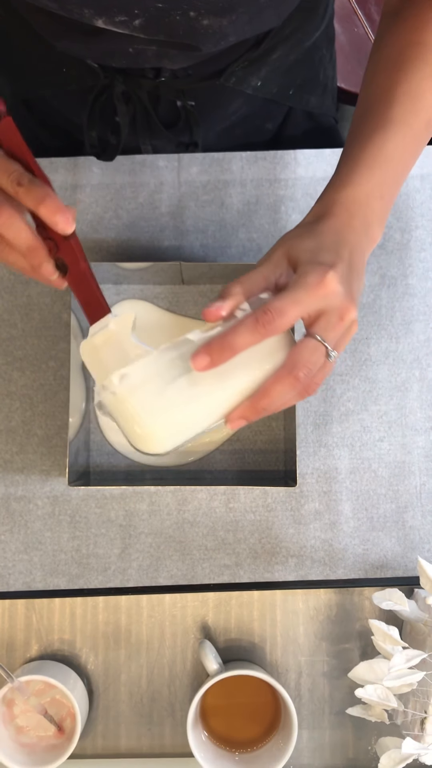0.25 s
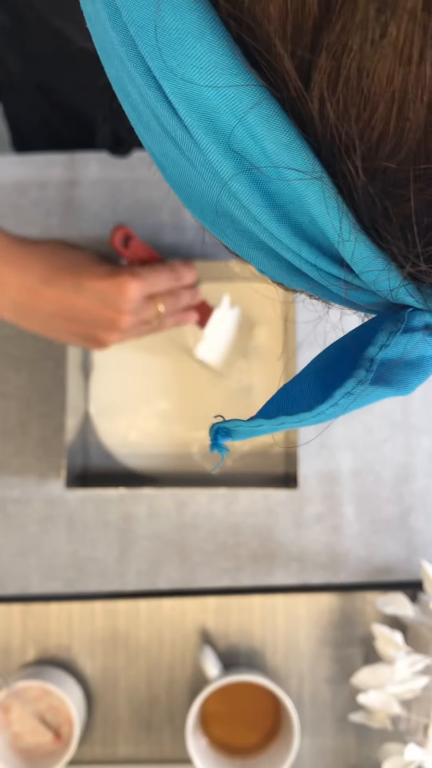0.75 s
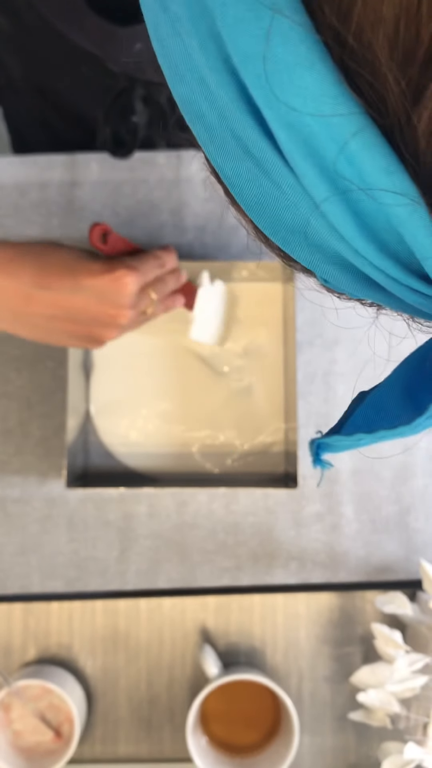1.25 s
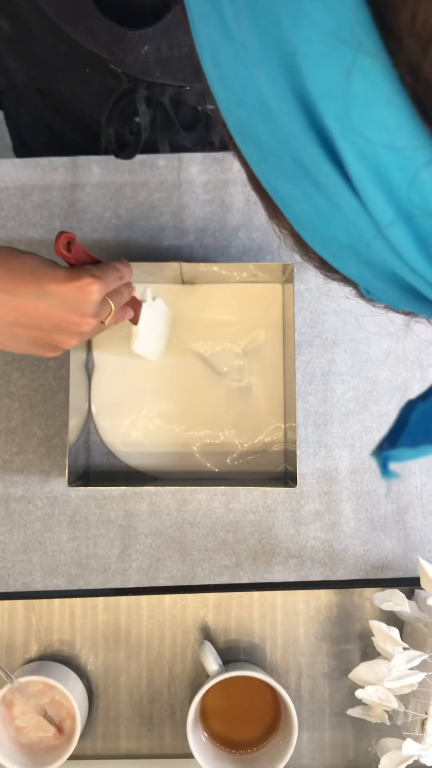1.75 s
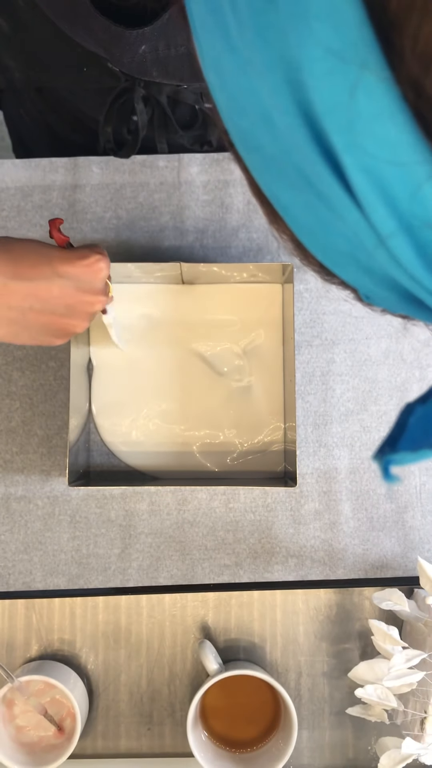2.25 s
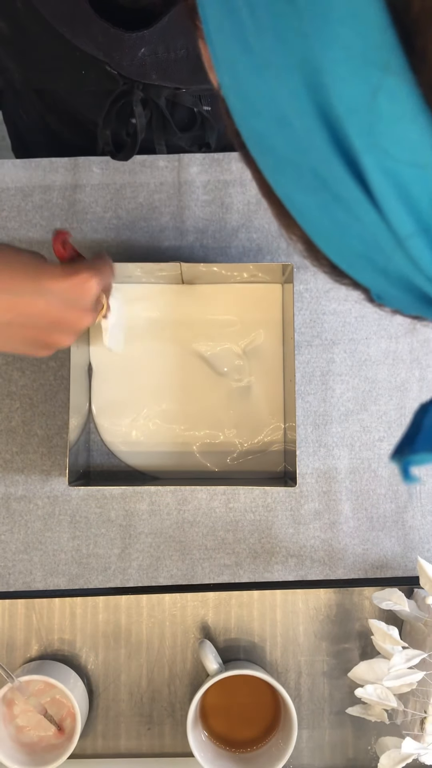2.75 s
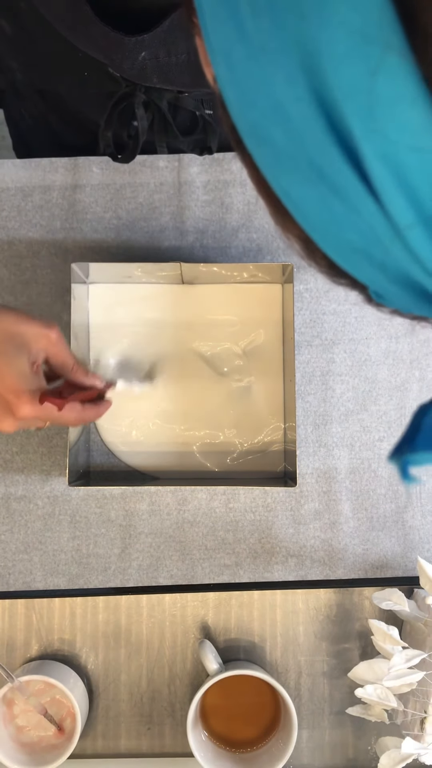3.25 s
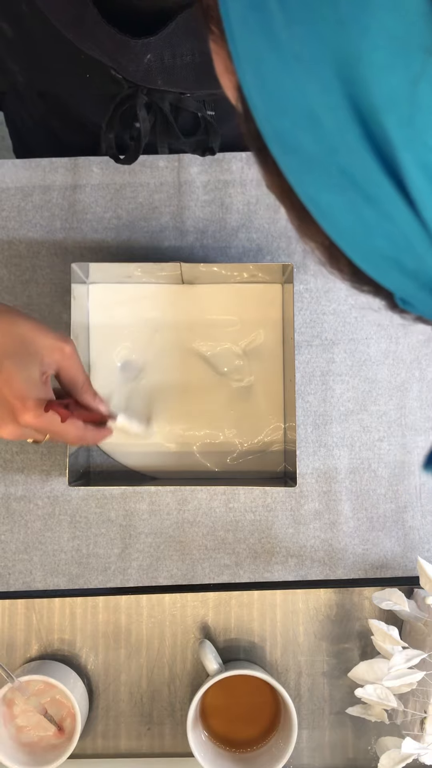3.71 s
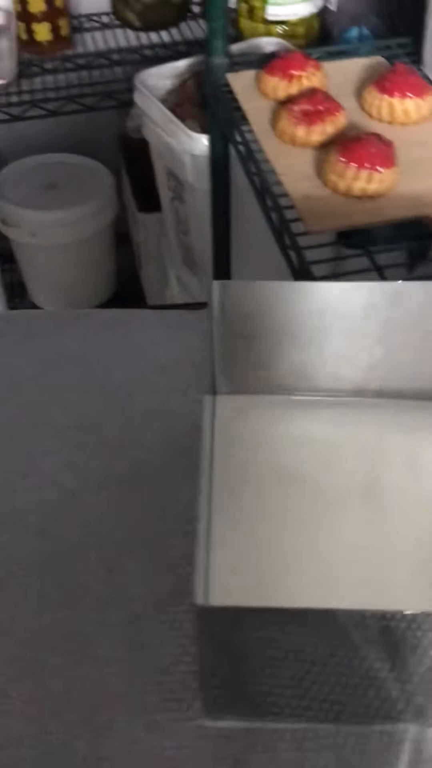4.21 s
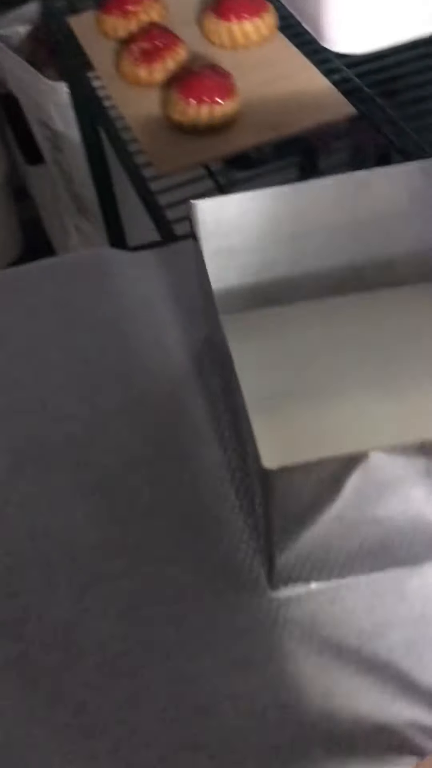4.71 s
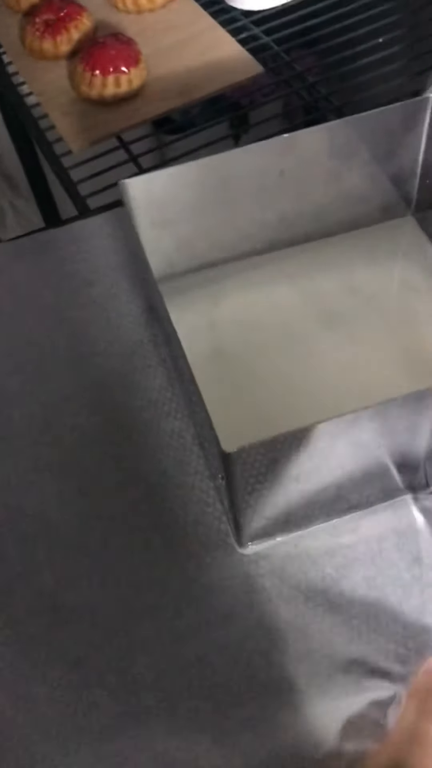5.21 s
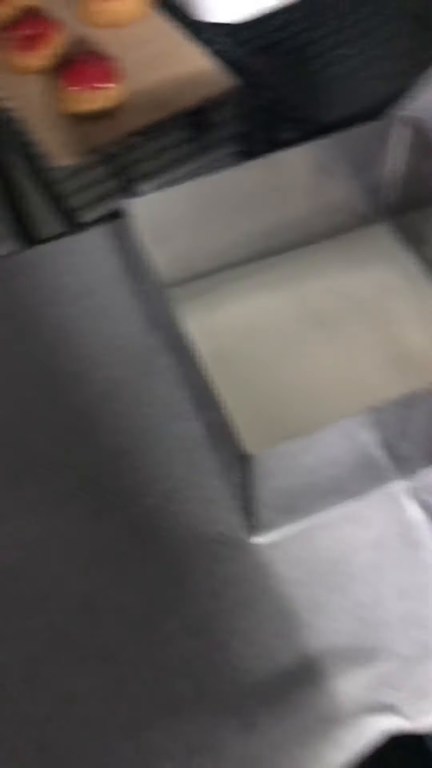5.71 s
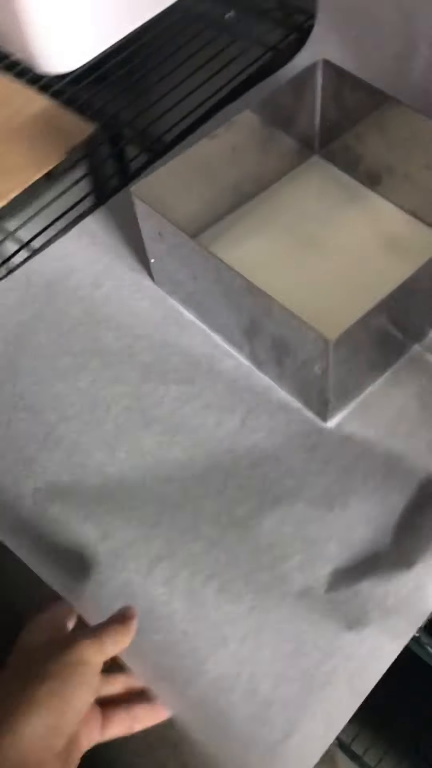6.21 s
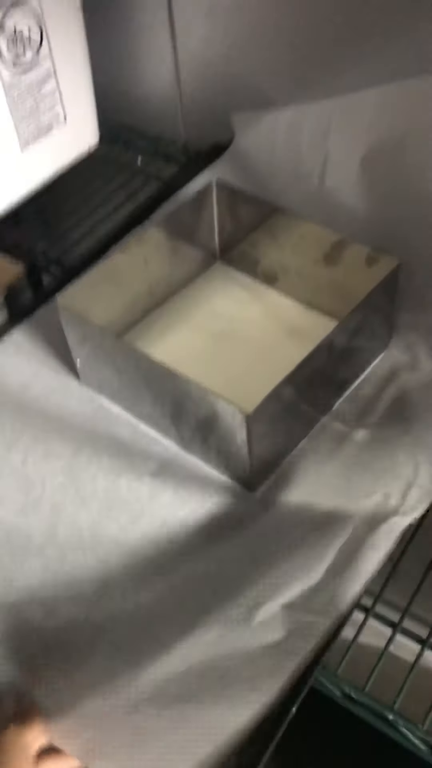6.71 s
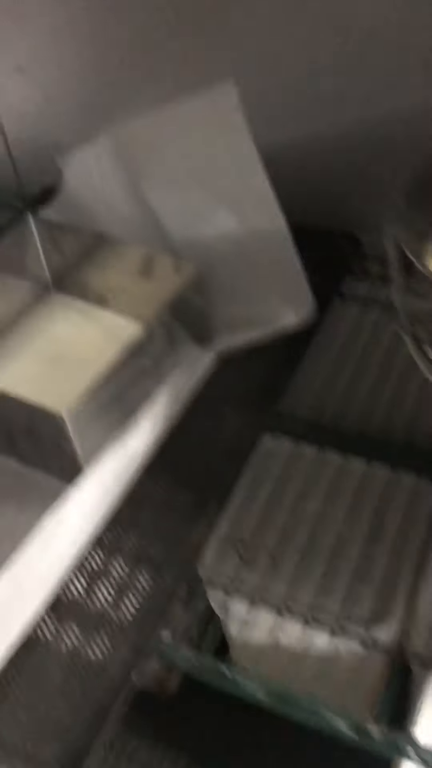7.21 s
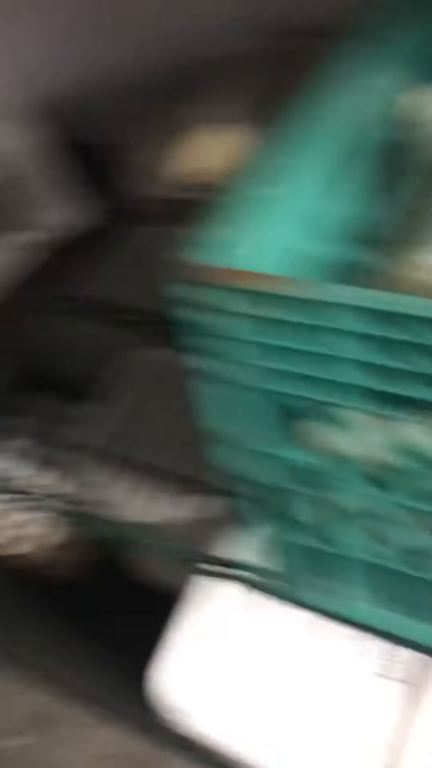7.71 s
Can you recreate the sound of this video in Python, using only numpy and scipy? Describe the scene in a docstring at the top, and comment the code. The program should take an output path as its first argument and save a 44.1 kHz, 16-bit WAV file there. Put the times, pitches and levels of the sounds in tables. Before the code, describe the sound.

A quiet kitchen has low room air and a wavering motor hum, joined after a hard cut by a faint distant compressor buzz. Another cut jumps to a much louder walk-in cold room, its fans throbbing rapidly under rushing air. Close to the microphone, baking paper crackles and snaps, a metal tray rattles against a wire shelf, then lands with a heavy low thump. Rustling fades, leaving the drone and two soft late bumps.

```python
"""Kitchen, then a walk-in cold room

Three shots, cut hard: two in a kitchen under a wavering motor hum, a distant compressor buzzing in the
second, then one in the cold room. There mains hum beats against a fan's blade tone over rushing air.
A tray lined with baking paper crackles, knocks the wire shelf and is set down with a thump.
Air and paper are shaped noise, hums are sines, and casing, snaps and shelf are decaying resonances."""
import sys
import numpy as np
from scipy import signal
from scipy.fft import rfft, irfft, next_fast_len
from scipy.io import wavfile
from scipy.ndimage import uniform_filter1d

SR = 44100
rng = np.random.default_rng(int(sys.argv[2]) if len(sys.argv) > 2 else 0)


def materialize(psi):
    """Save the field psi as 16-bit PCM at rate SR to the path in sys.argv[1].

    A 1-D psi becomes a single channel; in a 2-D psi each row is a channel.
    """
    bounded = np.clip(np.atleast_2d(psi).T, -1, 1)
    quanta = np.round(bounded * 32767).astype(np.int16)
    wavfile.write(sys.argv[1], SR, quanta)


N = 351036
T = np.arange(N) / SR  # s
KITCHEN_CUT_S, COLD_ROOM_CUT_S, FADE_S = 0.5131, 3.9952, 0.022  # starts of shots two and three, fade-in


def undb(db):
    """Amplitude factor for a level in dB."""
    return 10 ** (np.asarray(db) / 20)


def level(x, db):
    """Bring a sound to an rms level in dB."""
    return x * undb(db) / np.sqrt(np.mean(x ** 2))


def ring(x, hz, width):
    """Two-pole resonance, gain 1 at the centre, width in Hz."""
    return signal.lfilter(*signal.iirpeak(hz, hz / width, fs=SR), x)


def walk(rate):
    """Random levels held for 1 / rate seconds and smoothed twice; spread near 1."""
    hold = int(SR / rate)
    steps = np.repeat(rng.standard_normal(N // hold + 1), hold)
    return 1.3 * uniform_filter1d(uniform_filter1d(steps, hold), hold)[:N]


def colour(x, spectrum):
    """Shape a sound to (Hz, dB) points, joined by straight lines over log frequency."""
    size = next_fast_len(N)
    hz, db = np.transpose(spectrum)
    f = np.maximum(np.arange(size // 2 + 1) * SR / size, 1)
    gain = undb(np.interp(np.log(f), np.log(hz), db))
    return irfft(rfft(x, size) * gain, size)[:N]


def air(spectrum, db, modes, swell_db, upper_db=0):
    """Rushing air that swells a little, and the standing waves its rumble feeds in the room."""
    out = level(colour(rng.standard_normal(N), spectrum), db) * undb(swell_db * walk(1.97))
    for hz, width, mode_db in modes:
        wave = ring(ring(rng.standard_normal(N), hz, width), hz, width)
        # upper_db moves only the standing waves above 300 Hz
        out += level(wave, mode_db) * undb(upper_db * (hz > 300))
    return out


def motor_hum():
    """A motor in the kitchen: one sine that wavers in pitch and level."""
    pitch_hz = 116.9 + 1.25 * walk(6.7)
    hum = np.sin(2 * np.pi * np.cumsum(pitch_hz) / SR)
    return hum * undb(-35.5 + 4 * walk(6.89))


def compressor():
    """A distant compressor: uneven strokes, one a turn, ring its casing."""
    # Casing resonances. Each row: pitch in Hz, width in Hz, rms level in dB before its waver.
    casing = [(1300, 100, -60), (3600, 900, -64), (4500, 500, -66), (5260, 170, -60), (5868, 40, -65),
              (5986, 40, -64), (7860, 150, -72)]
    shaft_hz, flutter_db = 58.68, 2.5
    strokes = np.diff(np.floor(T * shaft_hz), prepend=0) * undb(1.5 * walk(25))
    # every stroke rattles the same way for a whole turn, which blurs the pulse
    rattle = irfft(np.exp(2j * np.pi * rng.random(int(SR / shaft_hz) // 2 + 1)))
    strokes = signal.fftconvolve(strokes, rattle)[:N]
    buzz = 0
    for hz, width, db in casing:
        tone = level(ring(ring(strokes, hz, width), hz, width), db)
        buzz = buzz + tone * undb(flutter_db * walk(7.94))  # each resonance wavers on its own
    return buzz


def kitchen():
    """Both kitchen shots: room air and motor hum, with the compressor in the second."""
    # Air in the first and second shot. Each row: frequency in Hz, relative level in dB per Hz.
    first_air = [(13, -38), (22, -8.5), (64, -4), (121, -13), (143, -28), (178, -14), (216, -16.5),
                 (290, -16), (420, -20), (480, -27), (1200, -28), (2780, -37), (7500, -49.5), (15800, -59)]
    second_air = [(13, -34), (22, -13), (64, -3), (121, -2.5), (143, -21), (178, -9.5), (216, -15),
                  (277, -10.5), (480, -22), (1330, -23.5), (1520, -25.5), (4840, -39.5), (5260, -38),
                  (15800, -53)]
    # Standing waves of the kitchen. Each row: pitch in Hz, width in Hz, rms level in dB.
    kitchen_modes = [(42.7, 6, -46), (65.8, 23, -38), (76.2, 8.8, -47), (135.2, 22, -47), (170, 18, -49.5),
                     (269, 6, -48), (292.8, 13, -47.5), (345.6, 3.3, -51), (396, 6.8, -57.5),
                     (415.3, 11, -57), (562.6, 62, -56), (672, 26, -67)]
    hum = motor_hum()
    buzz = compressor()
    first = air(first_air, -35.5, kitchen_modes, 0.63)
    second = air(second_air, -33.5, kitchen_modes, 0.47) + buzz
    return first + hum, second + hum


def along(column):
    """One column of the slow level changes, joined by straight lines over time."""
    # Slow wavering of the cold room's tones, standing waves and air. Each row: time in seconds,
    # blade octave in dB rms, motor whine in dB rms, change of the upper standing waves in dB,
    # change of all the air in dB.
    wavering = [(4.0, -36, -46.5, 2, 0.5), (5.2, -42.5, -43, 4.5, 0), (5.85, -36.5, -50, 0, 1.5),
                (6.4, -51, -50, -5.5, 0), (7.4, -46, -63, 5.5, -0.5), (7.96, -38, -60, 4, -1.5)]
    columns = np.transpose(wavering)
    return np.interp(T, columns[0], columns[column])


def cold_room_air():
    """Air rushing through the cold room, its level wavering."""
    # Air of the cold room. Each row: frequency in Hz, relative level in dB per Hz.
    cold_air = [(13, -62), (22, -28), (64, -13.5), (95, -24.5), (125, -8), (151, -13.5), (188, -16),
                (309, -17), (364, -17), (467, -21), (667, -19), (1010, -24.5), (1190, -21.5),
                (15800, -54.5)]
    # Standing waves of the cold room. Each row: pitch in Hz, width in Hz, rms level in dB before wavering.
    cold_modes = [(91.4, 13, -36), (130.9, 1, -33), (837, 14, -51), (174.8, 33, -37.5), (279, 29, -45.5),
                  (375.4, 26.6, -41), (529.5, 11, -50), (671.6, 8.5, -49)]
    return air(cold_air, -30, cold_modes, 0.51, along(3)) * undb(along(4))


def fans():
    """Mains hum and blade tone beat 16 times a second; the blade octave and a motor whine sit above."""
    mains_hz, blade_hz, whine_hz = 120.03, 136.075, 845
    align_s = 4.435  # the tones are in phase here, apart from their waver
    tones = mains_hz, blade_hz, 2 * blade_hz, whine_hz
    levels_db = -22, -24, along(1), along(2)  # rms, before the swell
    out = 0
    for hz, db in zip(tones, levels_db):
        waver = 1.5e-6 * hz ** 2 * walk(10)  # radians; higher tones shake more
        swell_db = walk(6)
        wave = np.cos(2 * np.pi * hz * (T - align_s) + waver)
        out = out + np.sqrt(2) * undb(db + swell_db) * wave
    return out


def paper():
    """Baking paper sliding and creasing: a hiss of fibres with many tiny creases in it."""
    # Paper on the move. Each row: time in seconds, level in dB before a 0.5 dB lift and the flicker.
    rustle = [(4.0, -49), (4.4, -42.5), (4.68, -49.5), (4.76, -43), (5.05, -48), (5.11, -48), (5.16, -30),
              (5.25, -44), (5.34, -64), (5.43, -48), (5.88, -48.5), (5.95, -39), (6.07, -35.5), (6.24, -42),
              (6.3, -53), (6.53, -44.5), (6.61, -48), (6.69, -43.5), (6.8, -51), (7.96, -65)]
    # Tone of the paper. Each row: frequency in Hz, relative level in dB per Hz.
    paper_tone = [(700, -22), (1500, -9), (3000, -3), (4500, -3), (6500, -1), (8500, -5), (10500, -8),
                  (13000, -8), (15800, -13)]
    # about 700 creases a second, a few much louder
    creases = (rng.random(N) < 700 / SR) * rng.standard_normal(N) * undb(1.1 * rng.exponential(size=N))
    # each crease becomes a brief burst of noise
    envelope = signal.lfilter([1], [1, -0.97], creases ** 2) ** 0.5
    creases = envelope * rng.standard_normal(N)
    hiss = level(rng.standard_normal(N), 0) + level(creases, -4)
    loudness_db = np.interp(T, *np.transpose(rustle)) + 1.3 * walk(60)
    return level(colour(hiss, paper_tone), 0.5) * undb(loudness_db)


def snaps():
    """Snaps of paper and tray: a short ring at a pitch, a bright grainy tail, a duller tray rattle."""
    # Each row: start in seconds, peak of the crack in dB, pitch in Hz, tail t60 in seconds,
    # top sizzle in dB relative to the rest.
    snap_list = [ (4.006, -24, 8500, .06, 3), (4.017, -19, 5000, .06, 2), (4.0298, -7, 8340, 0.14, 9),
                 (4.049, -11, 6940, 0.34, -10), (4.1367, -12.5, 3850, .07, -14),
                 (4.142, -18, 3840, .09, -15), (4.217, -12.5, 7800, 0.13, -15),
                 (4.2343, -21.5, 5250, 0.32, -5), (4.337, -17, 4800, .18, -9),
                 (4.3955, -26.5, 4210, 0.29, -18), (4.447, -20, 6000, .06, -8),
                 (4.457, -17, 6500, 0.11, -8), (4.4685, -19, 5500, 0.14, -3),
                 (4.4816, -13, 7340, 0.093, -2), (4.75, -18, 8000, 0.11, 0), (4.757, -9.5, 5210, 0.12, -3),
                 (4.7714, -9, 6950, .09, 1), (4.8705, -15, 4650, 0.15, -10), (4.9335, -24, 7000, .08, -2),
                 (4.9385, -21.5, 5370, 0.22, -7), (4.959, -22, 6480, 0.14, -10),
                 (4.9688, -8, 5800, 0.14, -5), (4.9845, -18.5, 5440, 0.19, -4), (5.011, -21, 5450, .06, 0),
                 (5.0297, -18, 8450, .05, -4), (5.0737, -18.5, 5420, 0.079, 0), (5.141, -26, 5000, .15, -9),
                 (5.161, -3.5, 6320, .28, 0), (5.423, -27, 5500, .13, -14),
                 (5.6155, -17.5, 5560, 0.14, -12), (5.765, -25, 6500, 0.19, -10),
                 (6.082, -12.5, 8200, 0.15, -5), (6.104, -20.5, 4560, 0.31, -15),
                 (6.1767, -20, 3800, 0.25, -6), (6.466, -27, 7500, .08, -13),
                 (6.518, -20.5, 5330, 0.17, -4), (6.552, -25.5, 7000, 0.14, 3),
                 (6.675, -27, 6000, 0.17, -12), (6.8389, -30, 7000, .1, -4), (6.897, -28, 6760, .08, 2)]
    # Steel frame on the tray. Each row: pitch in Hz, relative gain in dB.
    frame_modes = [(1467, 14), (2085, 11), (2800, 1), (3500, 14), (5220, 15), (5560, -8), (9577, -7),
                   (12000, -4)]
    out, t = np.zeros(N + SR), np.arange(SR // 3) / SR
    for start_s, db, hz, t60, top_db in snap_list:
        crack, bright, dull, grain = rng.standard_normal((4, len(t)))
        upper_hz = 11500 * (1 + 0.087 * np.tanh(grain[0]))  # differs from snap to snap
        # a snap that rings on longer also has a louder tail with more tray in it
        doublings = np.log2(max(t60, 0.01) * 10)  # of t60, from 0.1 s
        rattle_db = 1 + 2.5 * doublings
        tail_db = -24 + 5.5 * doublings

        crack = crack * np.exp(-t / 0.0005)
        sizzle = ring(crack, upper_hz, 0.12 * upper_hz) + 0.15 * ring(crack, 8300, 9000)
        crack = ring(crack, hz, 0.15 * hz) + undb(top_db) * sizzle

        decay = 1000 ** (-t / max(t60, 0.01)) + 0.78 * np.exp(-t / 0.0033)
        fade = (1 - np.exp(-t / 0.00058)) * decay
        bright = bright * undb(2.5 * np.repeat(grain, 100)[:len(t)])  # grains of 100 samples
        mid = level(ring(ring(bright, 5800, 8500), 5800, 8500), 0)
        mid = mid + level(ring(bright, hz, 0.04 * hz), -7)
        top = level(ring(ring(bright, 10700, 9900), 10700, 9900), top_db)
        # the rattle keeps the frame ringing
        frame = sum(undb(gain_db) * ring(dull, f, 0.02 * f) for f, gain_db in frame_modes)
        frame = level(frame, rattle_db - 12)
        rattle = level(ring(dull, 890, 3000), rattle_db)
        tail = undb(tail_db) * fade * (mid + top + frame + rattle)
        out[int(start_s * SR):][:len(t)] += undb(db) * (crack / np.abs(crack).max() + tail)
    return out[:N]


def thumps():
    """Low thumps and harder mid-pitched knocks on the shelf: modes near the push rise fast and die."""
    # Each row: start in seconds, level in dB, frequency in Hz around which the blow pushes.
    blows = [(4.049, -18.5, 550), (5.162, -29, 500), (6.171, -16.5, 188), (6.177, -25.5, 850),
             (6.195, -7, 85), (6.215, -27, 950), (6.231, -8.5, 95), (7.69, -21, 42), (7.78, -16, 58)]
    # What the shelf rings with. Each row: pitch in Hz, t60 in seconds.
    shelf = [(48, .24), (93, .33), (181, 0.19), (320, 0.13), (540, 0.16), (720, 0.066), (930, 0.088),
             (1040, 0.074)]
    out, t = np.zeros(N + SR), np.arange(SR // 2) / SR
    for start_s, db, push_hz in blows:
        for hz, t60 in shelf:
            off_db = 11.5 * np.log2(hz / push_hz) ** 2  # loss grows with the square of octaves away
            envelope = (1 - np.exp(-t * hz / 0.34)) * 1000 ** (-t / t60)
            mode = envelope * np.sin(2 * np.pi * hz * t)
            out[int(start_s * SR):][:len(t)] += undb(db - off_db) * mode
    return out[:N]


def scene():
    """The two kitchen shots and the cold room, one after another."""
    first, second = kitchen()
    cold = cold_room_air() + fans() + paper() + snaps() + thumps()
    # each shot ends abruptly and the next fades in
    second = second * np.clip((T - KITCHEN_CUT_S) / FADE_S, 0, 1)
    cold = cold * np.clip((T - COLD_ROOM_CUT_S) / FADE_S, 0, 1)
    later = np.where(T < COLD_ROOM_CUT_S, second, cold)
    return np.where(T < KITCHEN_CUT_S, first, later)[None]


def record(dry):
    """The microphone rounds loud peaks, dips at its port and loses deep bass; the top is cut in two steps."""
    dry = np.tanh(1.1 * dry) / 1.1
    out = dry - 0.5 * ring(dry, 10550, 600)  # port dip
    out = signal.sosfilt(signal.butter(2, 30, "high", fs=SR, output="sos"), out)
    # 24 dB down above 15750 Hz, then a further 70 dB above 16800 Hz
    out = signal.sosfilt(signal.ellip(6, 0.2, 24, 15750, fs=SR, output="sos"), out)
    return signal.sosfilt(signal.ellip(10, 0.2, 70, 16800, fs=SR, output="sos"), out)


dry = scene()
out = record(dry)
materialize(out)
```